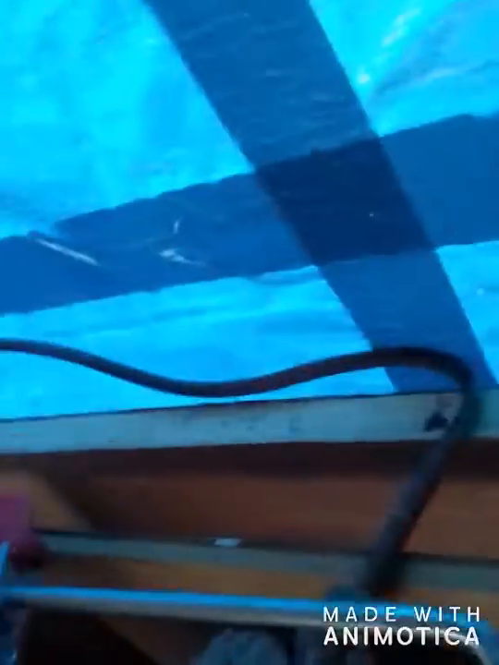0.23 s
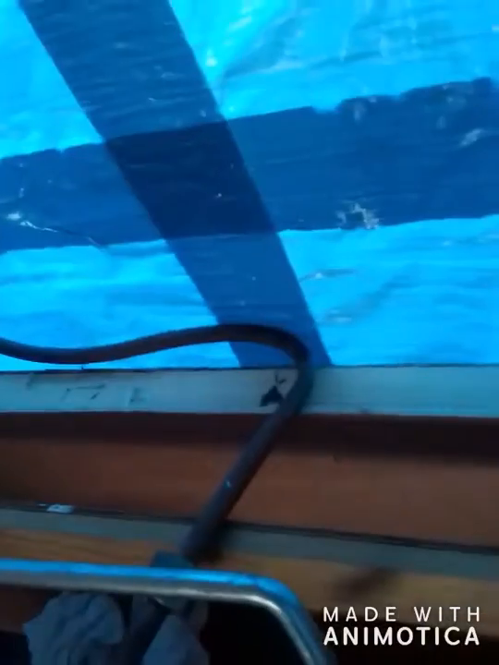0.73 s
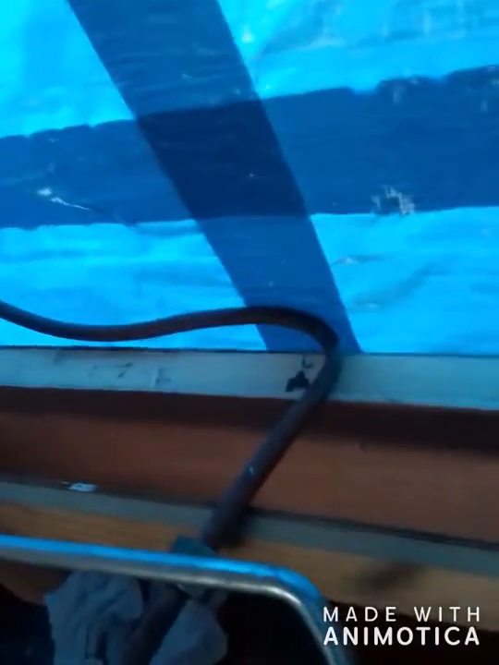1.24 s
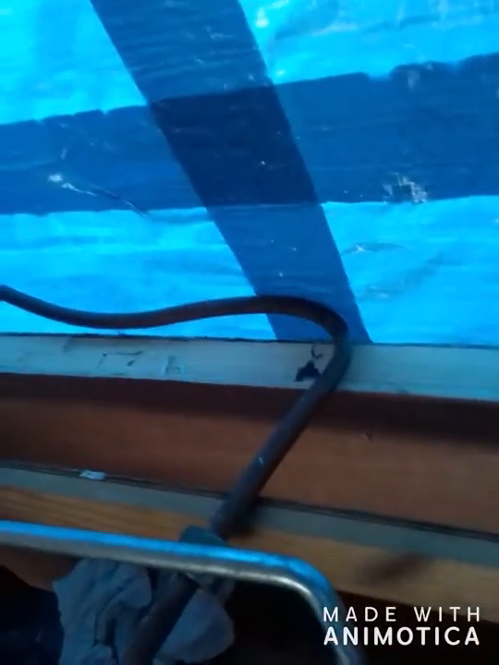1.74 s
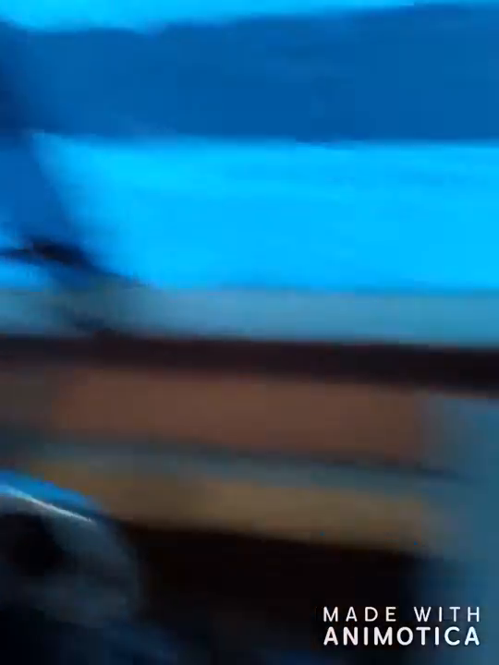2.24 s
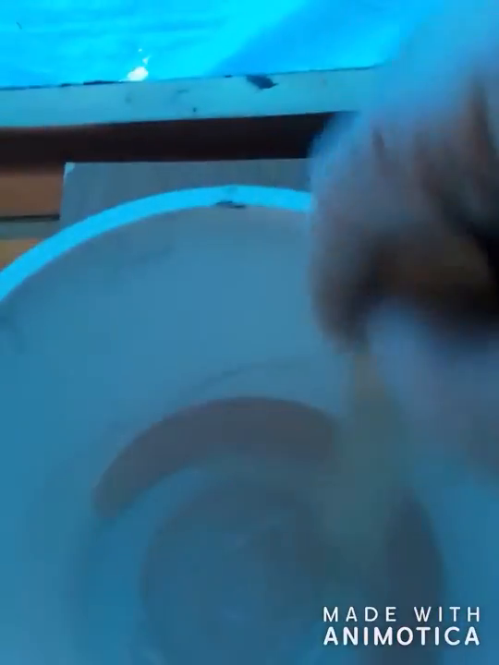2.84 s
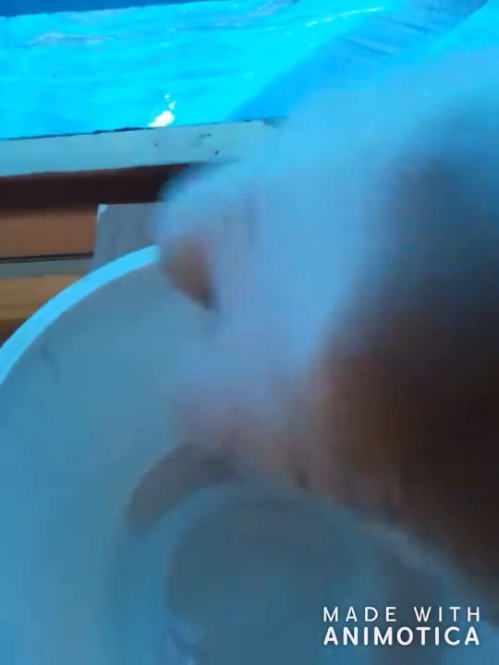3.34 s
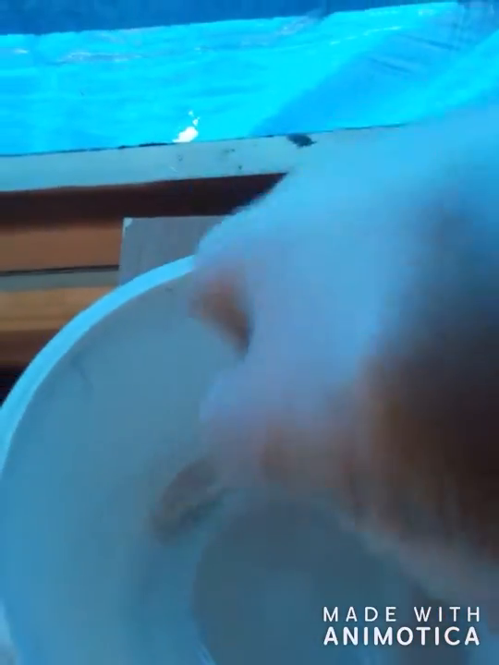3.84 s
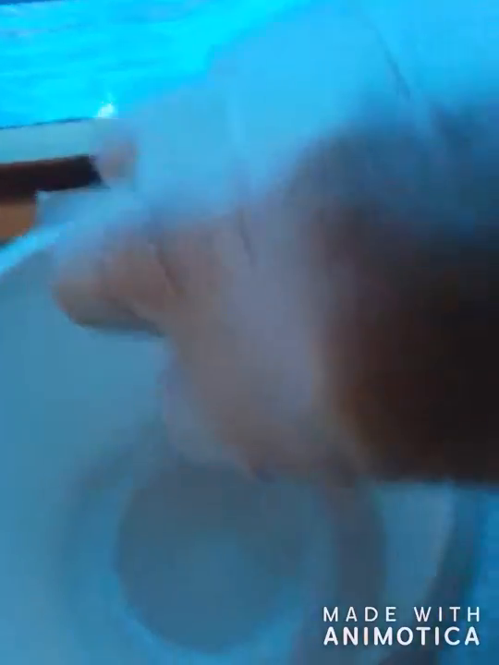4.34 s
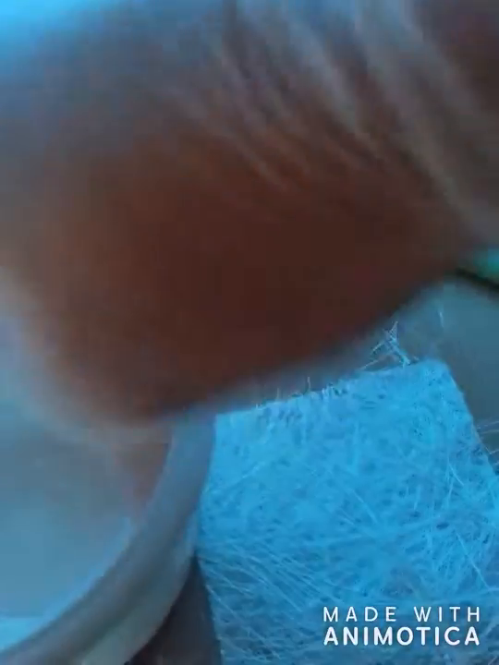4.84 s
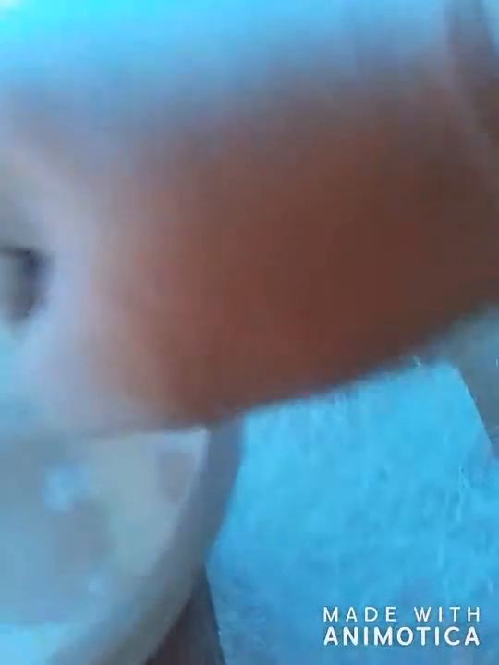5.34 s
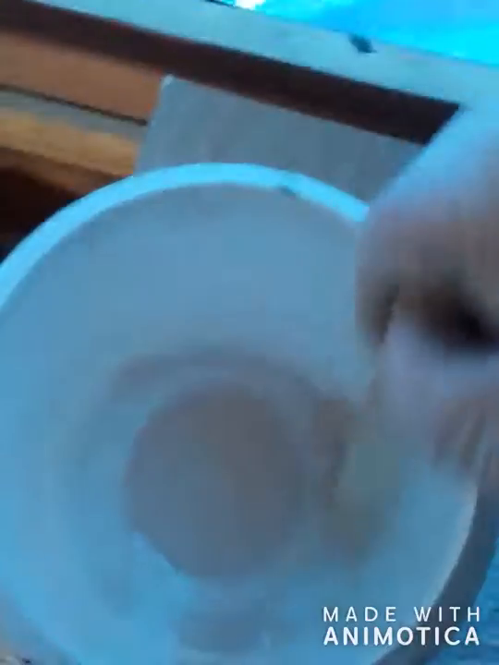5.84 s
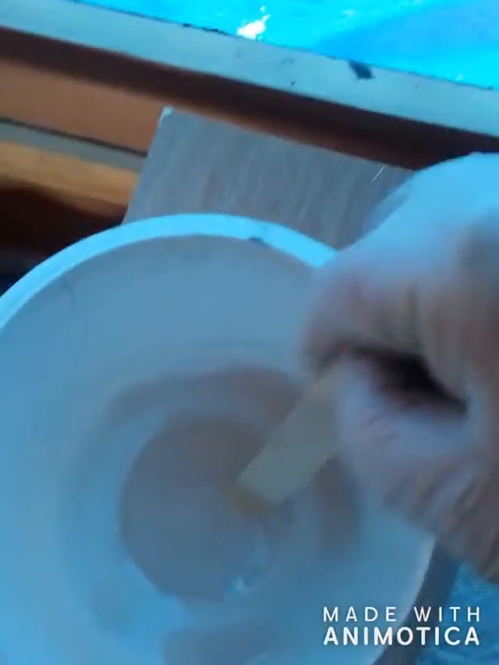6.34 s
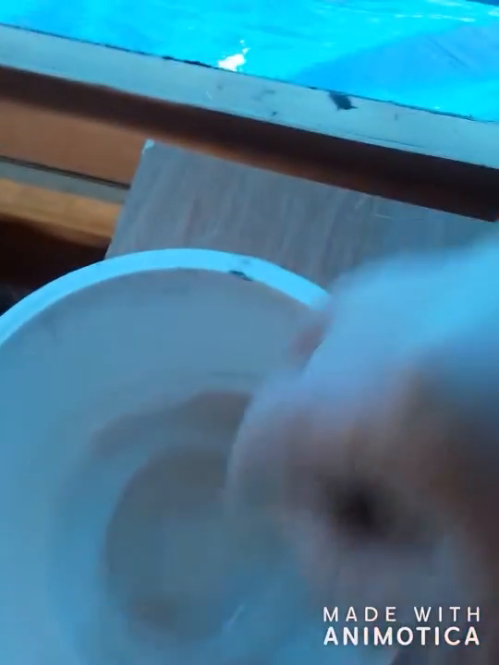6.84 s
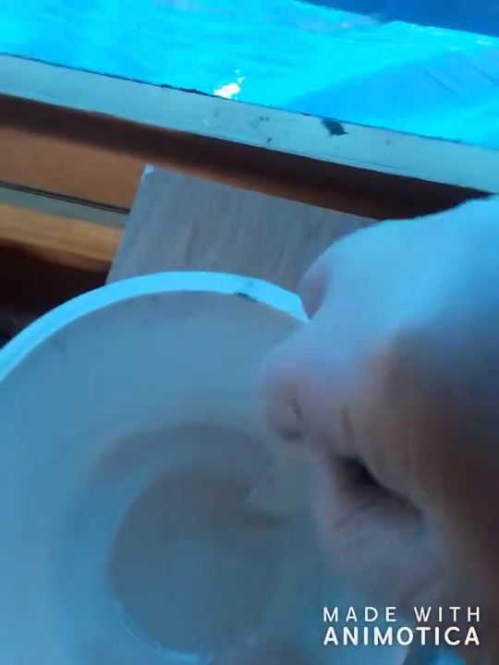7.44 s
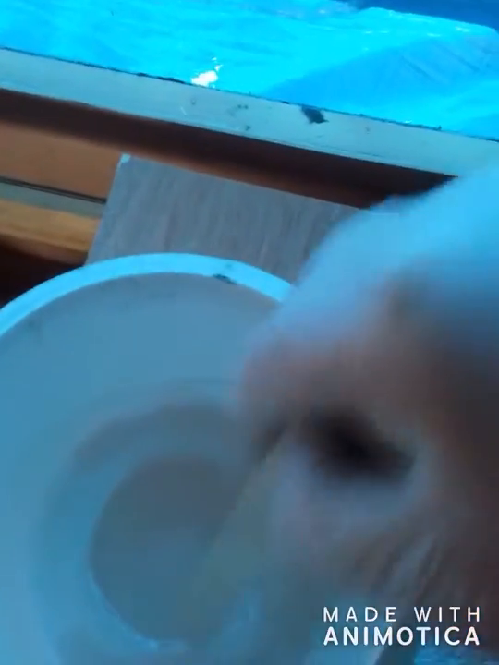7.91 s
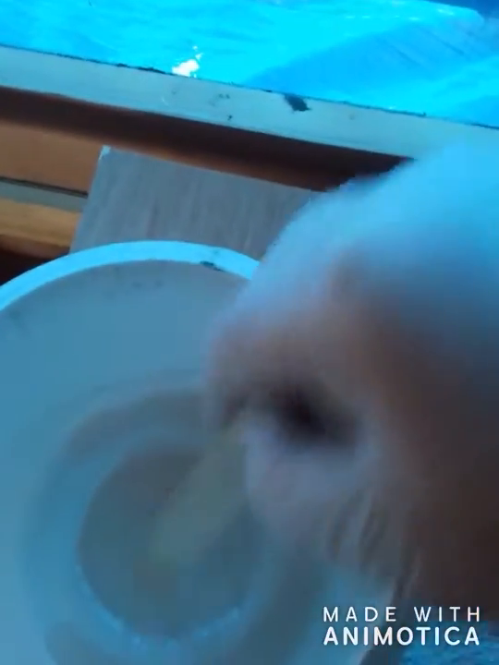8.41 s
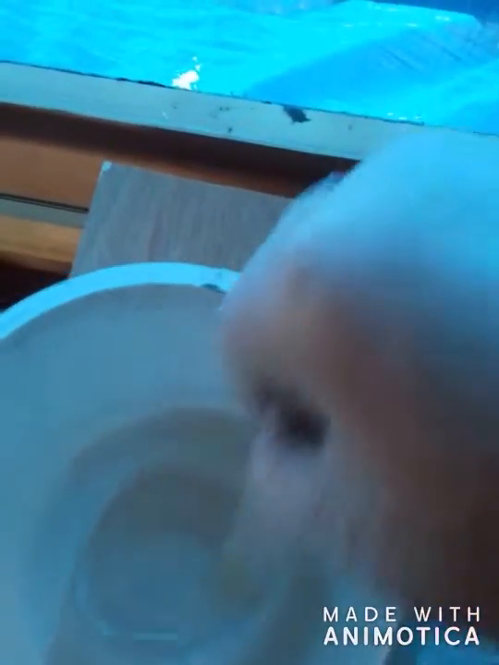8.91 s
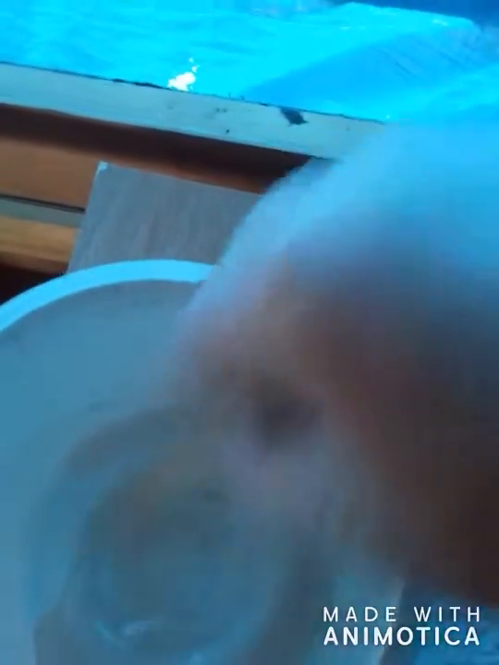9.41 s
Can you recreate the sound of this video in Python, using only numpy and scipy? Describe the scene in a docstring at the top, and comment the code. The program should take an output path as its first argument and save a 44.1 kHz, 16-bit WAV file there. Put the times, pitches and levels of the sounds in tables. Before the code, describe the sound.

A wooden stick rattles sharply inside a plastic bucket, then after a brief lull stirs thick resin with duller knocks, scrapes and soft low blobs.

```python
"""A wooden stick stirs thick resin in a plastic bucket: knocks and chatter drive stick, wall and bottom modes.
Sparse random slips make scrape and drag; banded grit makes swipes, squeaks and one faint whistle;
wavering tones make soft resin blobs. Band-wise decaying echoes stand for boards and tarpaulin overhead.
Shaped noise gives a faint steady wash of outdoor air, heard by a close small mono microphone.
A faint noise, different in each channel, rises with the treble of the sound."""
import sys
import numpy as np
from scipy import signal
from scipy.fft import rfft, irfft, next_fast_len
from scipy.io import wavfile
from scipy.ndimage import uniform_filter1d

SR = 44100
rng = np.random.default_rng(int(sys.argv[2]) if len(sys.argv) > 2 else 0)


def materialize(psi):
    """Save the field psi as 16-bit PCM at rate SR to the path in sys.argv[1].

    A 1-D psi becomes a single channel; in a 2-D psi each row is a channel.
    """
    bounded = np.clip(np.atleast_2d(psi).T, -1, 1)
    quanta = np.round(bounded * 32767).astype(np.int16)
    wavfile.write(sys.argv[1], SR, quanta)


def boost(x):
    """Linear amplitude factor 10**(x/20) for a level x in decibels (scalar or array-like)."""
    u = np.asarray(x, float) / 20
    return 10 ** u


N = 426447

# outdoor air, spectrum shape: f/Hz, density level/dB (relative)
AIR_SPECTRUM = [(15, -20), (25, 11), (33, -7), (284, -12), (326, -2), (482, -11), (1350, 2.5), (1820, -9),
                (3460, -13), (5110, -62), (6000, -18), (7800, -42.5), (13200, -120)]
AIR_RMS_DB = -64
# faint noise that follows the treble, spectrum shape: f/Hz, density level/dB (relative)
FOLLOWING_NOISE_SPECTRUM = [(25, -5.5), (200, -4), (1000, 5), (3800, -1), (6000, -5.5), (9000, -5.5),
                            (9900, -13.5), (10800, -6.5), (14400, -6.5), (15000, -12), (15500, -12.5)]
FOLLOWING_NOISE_RMS_DB = -63  # where the treble level is -24 dB
# microphone and port response: f/Hz, gain/dB
MIC_RESPONSE = [(20, -35.5), (60, -5), (150, -5), (3600, 0), (4900, -13), (5500, -21.5), (6500, -22),
                (9000, -28), (16000, -52)]
# echo decay of boards and tarpaulin: f/Hz, t60/s
SHELTER_DECAY = [(200, 0.16), (600, 0.1), (2000, 0.089), (5000, 0.082)]
# depth at which the stick works in the resin: t/s, depth (0-1)
RESIN_DEPTH = [(0, 0.14), (2.9, 0), (3.4, 0.73), (9.67, 0)]

# modes of each body: f/Hz, level/dB (relative), t60/s (ring() limits it and divides it by the damping)
BENCH_MODES = [(106, 7, 0.088), (210.4, 2.5, 0.078)]
BOTTOM_MODES = [(393, -31.5, 0.12), (400, 12, 0.31), (502, 15, 0.039)]
WALL_MODES = [(562, -25.5, 0.09), (615, 19.5, 0.037), (778, -9, 0.089), (860, -8.5, 0.023)]
STICK_MODES = [(1190, -13.5, 0.067), (1464, 5, 0.031), (1800, 11, 0.019), (2200, 1, 0.018),
               (2467, 1.5, 0.018), (3050, -33, 0.0072), (3400, -5.5, 0.0054), (4125, -0.5, 0.0043),
               (4240, 13.5, 0.0037)]

# low soft blobs as the resin folds over: t/s, peak level/dB, mean f/Hz
RESIN_BLOBS = [(1.141, -44, 205), (1.266, -55, 186), (2.666, -44, 194), (2.806, -51, 205),
               (2.926, -44.5, 200), (3.052, -55, 212), (3.9, -62, 244), (5.059, -52, 237), (5.63, -41, 230),
               (6.057, -50, 252), (6.699, -44, 195), (6.832, -52, 210), (6.989, -46, 200),
               (7.836, -45, 232), (8.053, -42, 246), (8.705, -54, 246), (9.178, -52, 252)]
BLOB_RISE_S, BLOB_T60_S, BLOB_WAVER_RMS = 0.011, 0.15, 0.11
# swipes, squeaks and one faint whistle: start t/s, length/s, level/dB (relative), centre f/Hz, pole width/Hz
SWIPE_EVENTS = [(0.176, 0.085, -34, 3300, 3660), (0.314, 0.09, -51, 3200, 2200),
                (0.571, 0.023, -32, 4500, 1200), (0.607, 0.034, -41, 2460, 1230),
                (1.141, 0.024, -42.5, 2950, 1990), (1.198, 0.091, -45.5, 2530, 1800),
                (1.385, 0.044, -45.5, 2730, 1800), (3.435, 0.14, -53.5, 2480, 1800),
                (3.606, 0.036, -50.5, 2200, 2010), (3.98, 0.084, -57.5, 2600, 2000),
                (4.32, 0.1, -59.5, 2800, 1800), (4.738, 0.21, -55, 2700, 1600),
                (5.753, 0.19, -48, 5800, 1500), (6.102, .115, -67, 2340, 30),
                (6.632, 0.028, -63, 2450, 1800), (6.77, 0.022, -42.5, 2550, 250),
                (7.289, 0.084, -44.5, 2550, 400), (7.261, 0.11, -49, 3750, 2200),
                (8.286, 0.069, -46.5, 2850, 2000), (8.935, 0.016, -42, 3250, 300),
                (9.57, 0.011, -36.5, 3820, 300)]
SWIPE_GLIDE = 0.02  # log-pitch spread of the slide, up or down
# strokes of the stick: t/s, tip scrape level/dB, drag level/dB (both relative)
STIR_STROKES = [(0.0, -52.5, -54), (0.83, -64, -62), (0.99, -72.5, -68.5), (1.53, -46, -58),
                (1.67, -107.5, -103), (2.05, -51.5, -63), (2.31, -59, -63), (2.75, -55, -55),
                (3.2, -69.5, -70.5), (3.77, -61.5, -62), (4.28, -67.5, -69.5), (4.74, -50, -52.5),
                (4.87, -59, -60), (5.09, -72, -92), (5.2, -74, -51), (5.71, -47.5, -56.5),
                (6.33, -73.5, -62.5), (6.68, -54, -48.5), (7.03, -63.5, -62), (7.48, -54.5, -64),
                (7.81, -77.5, -55), (8.05, -58, -42), (8.54, -59.5, -58.5), (9.67, -55, -65)]
DRY_TILT_DB_PER_OCT, WET_TILT_DB_PER_OCT = 2, -3.5
DRAG_TILT = 0.092  # dB per octave, per dB of drag over scrape
LEAN_DB, PUSH_DB, PUSH_T60_S = -13, -32.5, 0.42  # bench: gain re drag; jolt re thud, its decay
SKID_DB, SKID_T60_S = -25.5, 0.22  # scrape flare re click
SLOSH_DB, SLOSH_T60_S = -4, 0.18  # drag flare re thud
# clear blows: t/s, click level/dB, click centre f/Hz, bottom thud level/dB, wall knock level/dB (levels relative)
BLOWS = [(0.0812, -49, 3920, -71, -57), (0.1083, -17, 2560, -29, -25.5), (0.1321, -20.5, 3250, -43, -30),
         (0.3245, -40.5, 2090, -41, -34), (0.3965, -34, 2720, -41, -32.5),
         (0.4357, -17.5, 2220, -29.5, -41), (0.5257, -37, 2480, -42, -35), (0.575, -26, 2520, -41.5, -30.5),
         (0.6245, -34, 2460, -51, -49), (0.6614, -18.5, 2700, -35.5, -20),
         (0.6717, -10, 1890, -36.5, -15.5), (0.7127, -19, 2470, -50, -22), (0.7452, -28, 2500, -48, -50),
         (0.7687, -24.5, 1900, -38, -39), (0.7786, -20, 2360, -39, -16), (0.8001, -18.5, 3340, -68, -31),
         (0.833, -11, 2420, -39.5, -20), (0.8836, -9, 2400, -57, -28), (0.9208, -31, 2520, -35, -46),
         (0.977, -12, 2300, -69, -23.5), (1.1528, -23.5, 3580, -44, -62), (1.263, -28, 2080, -59, -54),
         (1.3289, -29, 2410, -55, -26), (1.4392, -24, 2390, -67, -24.5), (1.5033, -40, 2540, -61.5, -32),
         (1.58, -14.5, 1806, -33.5, -18), (1.6175, -25, 3220, -49, -29), (1.6347, -10, 1780, -46, -16),
         (1.7994, -35, 3400, -50, -27), (1.819, -27.5, 1840, -41, -35), (1.8313, -21, 1920, -38, -27),
         (1.8774, -15.5, 2260, -35, -16), (1.955, -21, 2200, -40.5, -20.5), (1.986, -34, 2950, -57, -44),
         (2.0089, -33, 2920, -37.5, -62), (2.1003, -18.5, 1810, -43.5, -20),
         (2.1403, -28.5, 1880, -50, -57), (2.2443, -22.5, 2400, -48.5, -27.5),
         (2.2653, -28, 2520, -55, -35), (2.3237, -30, 2170, -49, -57), (2.37, -19.5, 1830, -42, -18.5),
         (2.428, -30.5, 3750, -53.5, -56), (2.4944, -44, 2360, -65, -51), (2.5232, -8, 2350, -36, -13.5),
         (2.5868, -23.5, 2500, -36.5, -35), (2.6014, -23.5, 2610, -40.5, -34),
         (2.6399, -31, 2580, -49, -48), (2.6988, -38, 2350, -56, -48), (2.7246, -25, 3220, -47, -31.5),
         (2.7774, -37, 2430, -48, -29.5), (2.7846, -27.5, 1800, -34.5, -26.5),
         (2.7984, -25, 3000, -56, -56), (2.9189, -38, 2440, -50.5, -58), (2.9628, -42.5, 2330, -43.5, -40),
         (3.4178, -23, 2160, -32.5, -29), (3.7216, -30, 2060, -38.5, -34.5), (3.844, -39.5, 2530, -51, -48),
         (3.9045, -40, 2100, -41.5, -53), (4.2438, -36.5, 2120, -39, -33.5), (4.2911, -36, 2120, -46, -51),
         (4.5257, -31.5, 3300, -56, -39), (4.596, -14.5, 2300, -25.5, -26.5),
         (4.6574, -34.5, 2530, -36.5, -34.5), (4.7899, -47, 2040, -43, -61), (5.0467, -20, 2130, -22, -24),
         (5.1128, -30.5, 2130, -32.5, -37), (5.1509, -24, 2640, -56, -41), (5.1706, -29.5, 2700, -39, -38),
         (5.3043, -57, 2190, -56, -41), (5.3732, -23.5, 2920, -54, -35.5),
         (5.4166, -36.5, 2180, -47, -35.5), (5.5278, -62, 2170, -56, -44),
         (5.6013, -25.5, 2450, -31.5, -50), (5.6311, -25.5, 2270, -31, -45), (5.6658, -39, 2420, -32, -52),
         (5.6884, -30, 2460, -42, -49), (5.7104, -34, 1990, -50, -44), (5.7273, -38.5, 2540, -33.5, -43),
         (5.752, -31.5, 2390, -54, -47), (5.8076, -12, 2400, -28.5, -18.5), (5.8617, -41, 1970, -38, -40),
         (5.896, -40.5, 1900, -46, -37), (6.0536, -28, 2340, -31.5, -28), (6.071, -30.5, 2170, -35, -46),
         (6.3128, -29.5, 2300, -55.5, -30.5), (6.5039, -39, 1880, -35.5, -34),
         (6.5189, -33.5, 1900, -35.5, -61), (6.5888, -31, 2330, -42.5, -47), (6.6546, -39, 2220, -51, -64),
         (6.7278, -43, 1920, -38.5, -59), (6.776, -37, 2470, -58, -68), (6.9271, -38, 2320, -38.5, -34.5),
         (7.213, -27.5, 2070, -36.5, -61), (7.265, -49, 3700, -44.5, -60), (7.4908, -44, 2010, -45, -38),
         (7.5023, -32.5, 1850, -50, -39), (7.5605, -33, 1760, -43, -39.5), (7.6555, -40.5, 2350, -50, -47),
         (7.7653, -47, 2000, -63, -38.5), (7.8164, -31.5, 2130, -44, -59), (7.8297, -33, 1920, -34, -61),
         (7.8802, -35, 2120, -39, -58), (7.8969, -36.5, 2040, -32, -61), (7.9644, -21, 2230, -28.5, -62),
         (8.0117, -31, 2440, -37, -52), (8.0554, -20, 2150, -36, -54), (8.0654, -30, 1970, -40, -44),
         (8.1301, -24.5, 2390, -30.5, -34), (8.1486, -30, 1780, -29.5, -57),
         (8.2903, -26.5, 2400, -33.5, -59), (8.3533, -20.5, 2340, -31, -34), (8.3824, -32, 2100, -47, -57),
         (8.4926, -34.5, 2340, -44, -30), (8.548, -33, 2300, -44, -33), (8.5616, -25, 2580, -49.5, -33),
         (8.685, -26, 2430, -34.5, -63), (8.8166, -38, 2350, -36.5, -50), (8.8316, -26, 2300, -46, -57),
         (8.8365, -32.5, 2240, -33.5, -43), (8.9364, -53, 3200, -62, -60), (9.0461, -21, 2470, -36.5, -46),
         (9.1285, -46, 1900, -45, -47), (9.179, -34.5, 2160, -40.5, -52), (9.3646, -29, 3500, -55, -45),
         (9.3736, -31.5, 1950, -52, -56), (9.404, -31, 2330, -56, -67), (9.4147, -42, 2040, -58, -39.5),
         (9.4564, -42, 3740, -64, -64), (9.5205, -32.5, 2420, -42, -62), (9.5726, -47, 3680, -50, -68)]
CHATTER_T60_S, CHATTER_PER_DB = 0.094, 0.9058  # t60 for thud equal to the louder of click and knock; its slope
REBOUND_DB, REBOUND_SPREAD_DB, REBOUND_BEND = -22.5, 4.5, 0.31  # mean, spread re blow; log-pitch spread


def evened(x):
    """Scales to rms 1."""
    return x / np.sqrt(np.mean(x ** 2) + 1e-20)


def read(points, hz):
    """Interpolates a spectrum on a log-frequency axis."""
    f, value = np.transpose(points)
    return np.interp(np.log(hz + 1), np.log(f + 1), value)


def curve(rows):
    """Interpolates the columns of a time table at every sample."""
    s, *columns = np.transpose(rows)
    return [np.interp(np.arange(N) / SR, s, c) for c in columns]


def coloured(points):
    """Steady noise of rms 1 with the given spectrum."""
    hz = np.fft.rfftfreq(N, 1 / SR)
    return evened(irfft(rfft(rng.standard_normal(N)) * boost(read(points, hz)), N))


def ring(modes, spot_db=0, bend=1, damping=1):
    """Impulse response of decaying modes; the spot hit weighs (spot_db) and detunes (bend) each."""
    hz, db, t60 = np.transpose(modes)[:, :, None]
    t = np.arange(4096) / SR
    level_db = db + np.reshape(spot_db, (-1, 1)) - 60 * t * damping / np.clip(t60, 0.003, 0.2)
    tones = np.sin(2 * np.pi * hz * np.reshape(bend, (-1, 1)) * t)
    body = (boost(level_db) * tones).sum(0)
    # a small body hardly radiates below its lowest mode
    leak = np.exp(-2 * np.pi * 0.81 * hz.min() / SR)
    return signal.lfilter([1, -2, 1], [1, -2 * leak, leak ** 2], body)


def after_blows(level_db, t60_s):
    """Gain that jumps at each blow and dies away; overlapping jumps add in power."""
    jumps = np.zeros(N)
    jumps[(np.transpose(BLOWS)[0] * SR).astype(int)] = boost(level_db) ** 2
    return np.sqrt(signal.lfilter([1], [1, -boost(-2 * 60 / (t60_s * SR))], jumps))


def slips(per_second):
    """Stick-slip force: sparse random impulses of uneven size."""
    hits = rng.standard_normal(N) * (rng.random(N) < per_second / SR)
    return hits * boost(1.5 * np.minimum(rng.exponential(1, N), 4))


def clumps(spread_db):
    """Slow random gain that gathers slips into clumps."""
    return boost(spread_db * evened(uniform_filter1d(rng.standard_normal(N), 400)))


def rubbed(force, modes, damping):
    """A body rung by a steady stream of slips, rms 1."""
    return evened(signal.oaconvolve(force, ring(modes, damping=damping))[:N])


def air():
    """Outdoor air as steady shaped noise."""
    return boost(AIR_RMS_DB) * coloured(AIR_SPECTRUM)


def following_noise(heard):
    """Faint shaped noise, different in each channel, that rises with the treble of the sound."""
    treble = np.diff(heard[0], 2, prepend=[0, 0])
    treble_db = 10 * np.log10(abs(uniform_filter1d(treble ** 2, size=1200)) + 1e-9)
    gain = boost(FOLLOWING_NOISE_RMS_DB + 0.12 * (treble_db + 24))
    return gain * np.array([coloured(FOLLOWING_NOISE_SPECTRUM), coloured(FOLLOWING_NOISE_SPECTRUM)])


def microphone(dry):
    """Minimum-phase response of the microphone, whose port cuts the treble."""
    size = next_fast_len(N + 4096)
    log_gain = np.log(boost(read(MIC_RESPONSE, abs(np.fft.fftfreq(size, 1 / SR)))))
    causal = np.exp(log_gain - 1j * signal.hilbert(log_gain).imag)[:size // 2 + 1]
    return irfft(rfft(dry, size) * causal, size)[:, :N]


def shelter(x):
    """Sparse echoes from boards and tarpaulin, each band dying at its own speed."""
    taps = rng.choice([-1., 1.], SR // 2) * (rng.random(SR // 2) < 2000 / SR)
    taps[:150] = 0
    hz, t, z = signal.stft(taps, SR, nperseg=256)
    decay = boost(-60 * t / read(SHELTER_DECAY, hz)[:, None])
    tail = signal.istft(z * decay, SR, nperseg=256)[1]
    return signal.fftconvolve(x, tail / np.linalg.norm(tail))[:N]


def bench():
    """Low modes under the bucket, leaned on by the drag and jolted by thuds."""
    drag_db = curve(STIR_STROKES)[1]
    thud_db = np.transpose(BLOWS)[3]
    push = boost(drag_db + LEAN_DB) + after_blows(thud_db + PUSH_DB, PUSH_T60_S)
    return push * rubbed(slips(300), BENCH_MODES, 0.75)


def blobs():
    """Folding resin: a soft low tone that swells, wavers in pitch and dies."""
    out, t = np.zeros(N + 8192), np.arange(8192) / SR
    shape = (1 - np.exp(-t / BLOB_RISE_S)) * boost(-60 * t / BLOB_T60_S)
    for s, db, hz in RESIN_BLOBS:
        waver = 1 + BLOB_WAVER_RMS * evened(uniform_filter1d(rng.standard_normal(len(t)), size=700))
        tone = np.sin(2 * np.pi * hz * np.cumsum(waver) / SR)
        out[round(s * SR):][:len(t)] += boost(db) * shape / shape.max() * tone
    return out[:N]


def swipes():
    """Dense grit in a gliding band: wide ones hiss and also ring the stick, narrow ones squeak or whistle."""
    out = np.zeros(N)
    for s, length_s, db, centre_hz, width_hz in SWIPE_EVENTS:
        count = round(length_s * SR)
        glide = np.exp(SWIPE_GLIDE * rng.standard_normal())
        grit = rng.standard_normal(count) * boost(2.8 * rng.exponential(1, count))
        hz = np.geomspace(centre_hz / glide, centre_hz * glide, count)
        turn = np.exp(2j * np.pi * np.cumsum(hz) / SR)
        # shift the band to 0 Hz, low-pass with a double pole, shift back
        pole = np.exp(-np.pi * width_hz / SR)
        band = (turn * signal.lfilter([1], np.convolve([1, -pole], [1, -pole]), grit / turn)).real
        stick = evened(signal.fftconvolve(grit, ring(STICK_MODES))[:count])
        sound = evened(band) + width_hz / 4000 * stick
        along = np.linspace(0, 1, count)
        swell = (1 - np.exp(-along / 0.23)) * (1 - along ** 6)  # grows, then stops short
        out[round(s * SR):][:count] += boost(db) * swell * sound
    return out


def drag():
    """Clumped slips through wall and bottom; depth mutes the wall, thuds set off flares."""
    drag_db, depth = curve(STIR_STROKES)[1], curve(RESIN_DEPTH)[0]
    thud_db = np.transpose(BLOWS)[3]
    wall = rubbed(slips(500), WALL_MODES, 2.3)
    bottom = rubbed(slips(400), BOTTOM_MODES, 2.6)
    gain = boost(drag_db) + after_blows(thud_db + SLOSH_DB, SLOSH_T60_S)
    return clumps(4) * gain * (boost(-1 - 9.8 * depth) * wall + 0.8 * bottom)


def scrape():
    """Clumped dense tip slips ring the stick and rasp directly; depth dulls them, clicks set off flares."""
    (tip_db, drag_db), depth = curve(STIR_STROKES), curve(RESIN_DEPTH)[0]
    tilt_db = DRY_TILT_DB_PER_OCT + (WET_TILT_DB_PER_OCT - DRY_TILT_DB_PER_OCT) * depth
    tilt_db = tilt_db + DRAG_TILT * (drag_db - tip_db)
    force = slips(4000)
    stick = rubbed(force, STICK_MODES, 1.44)
    tip = np.clip(0.5 - 0.74 * depth, 0, 1) * stick + 0.84 * evened(force)
    rasp = np.zeros(N)
    for octave, sign, edges_hz in [(-1, -1, (700, 1500)), (0, 1, (1500, 2900)), (1, -1, (2900, 5500))]:
        sos = signal.butter(N=2, Wn=edges_hz, btype="band", fs=SR, output="sos")
        rasp += sign * boost(octave * tilt_db) * signal.sosfilt(sos, tip)
    click_db = np.transpose(BLOWS)[1]
    return clumps(4.2) * rasp * (boost(tip_db) + after_blows(click_db + SKID_DB, SKID_T60_S))


def rebounds():
    """The stick touches once more after every blow, on average weaker, with its own colour."""
    s, click_db, centre_hz, thud_db, knock_db = np.transpose(BLOWS)
    late_s = rng.uniform(0.008, 0.045, len(s))
    click, thud, knock, tone = rng.standard_normal((4, len(s)))
    click_db = click_db + REBOUND_DB + REBOUND_SPREAD_DB * click
    thud_db = thud_db + REBOUND_DB + REBOUND_SPREAD_DB * thud
    knock_db = knock_db + REBOUND_DB + REBOUND_SPREAD_DB * knock
    return list(zip(s + late_s, click_db, centre_hz * np.exp(REBOUND_BEND * tone), thud_db, knock_db))


def knocks():
    """Contact force builds in about a millisecond, chatters and skids on; stick, wall and bottom ring."""
    out, t = np.zeros(N + 8192), np.arange(4096) / SR
    stick_hz, depth = np.transpose(STICK_MODES)[0], curve(RESIN_DEPTH)[0]
    modes = len(stick_hz)
    for s, click_db, centre_hz, thud_db, knock_db in list(BLOWS) + rebounds():
        at = round((s - 0.0008) * SR)
        wet = depth[at]
        # the more a blow lands on the bottom, the longer the chatter
        bottom_share_db = thud_db - max(click_db, knock_db)
        chatter_s = np.clip(CHATTER_T60_S * boost(CHATTER_PER_DB * bottom_share_db), 0.003, 0.2)
        bounces = rng.standard_normal(len(t)) * (rng.random(len(t)) < 6000 / SR)
        skid = boost(-25.5 + 9.7 * wet - 60 * t / (4 * chatter_s))  # stronger with a wet tip
        fading = boost(-60 * t / chatter_s) + skid
        force = (bounces * fading + 4.2 * np.exp(-t / 0.000067)) * (1 - np.exp(-t / 0.00071))
        spot_db = -12 * np.log2(stick_hz / centre_hz) ** 2 - 3 * wet * np.log2(stick_hz / 2000)
        spot_db += (4 + 2.5 * wet) * rng.standard_normal(modes)
        bend = 1 + (0.005 + 0.097 * wet) * rng.standard_normal(modes)  # resin loads the modes unevenly
        wall_bend = bend[:len(WALL_MODES)] ** 0.7
        bottom_bend = bend[:len(BOTTOM_MODES)] ** 1.2
        parts = [(ring(STICK_MODES, spot_db, bend, 1 + 0.9 * wet), click_db - 7),
                 (ring([(centre_hz, 0, 0.008)]), click_db - 13 + 4 * wet),  # patch of wall under the tip
                 (ring([(1600, 5.5, 0.0035), (3120, -11, 0.003)]), click_db - 21),  # dry contact crunch
                 (ring(WALL_MODES, 0, wall_bend, 1 + 3.9 * wet), knock_db),
                 (ring(BOTTOM_MODES, 0, bottom_bend, 3.2 + 0.44 * wet), thud_db)]
        for body, db in parts:
            sound = signal.fftconvolve(force, body)
            peak_rms = np.sqrt(uniform_filter1d(sound ** 2, size=132).max())  # 3 ms window
            out[at:at + len(sound)] += boost(db) * sound / peak_rms
    return out[:N]


def scene():
    """Bucket, its echoes and the air, equal in both channels."""
    bucket = knocks() + scrape() + drag() + bench() + swipes() + blobs()
    mono = bucket + boost(-13) * shelter(bucket) + air()
    return np.array([mono, mono])


def roll_off(x):
    """The treble ends steeply here."""
    return signal.sosfilt(signal.butter(12, 15810, fs=SR, output="sos"), x)


def record(dry):
    """Microphone response, treble-following noise and converter offset, then the finished mix is stored."""
    heard = microphone(dry)
    offset = -0.0006  # the converter rests slightly below zero
    mix = heard + following_noise(heard) + offset
    return roll_off(mix)


dry = scene()
out = record(dry)
materialize(out)
```